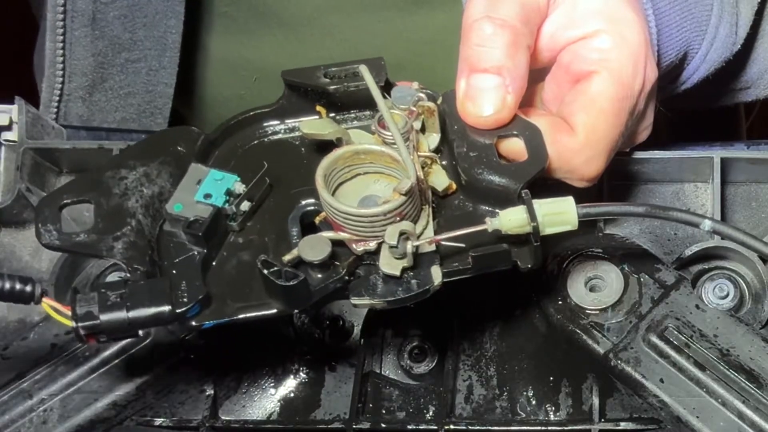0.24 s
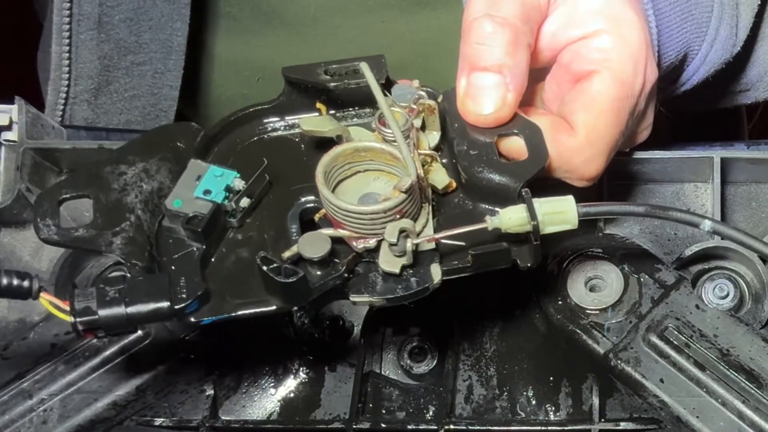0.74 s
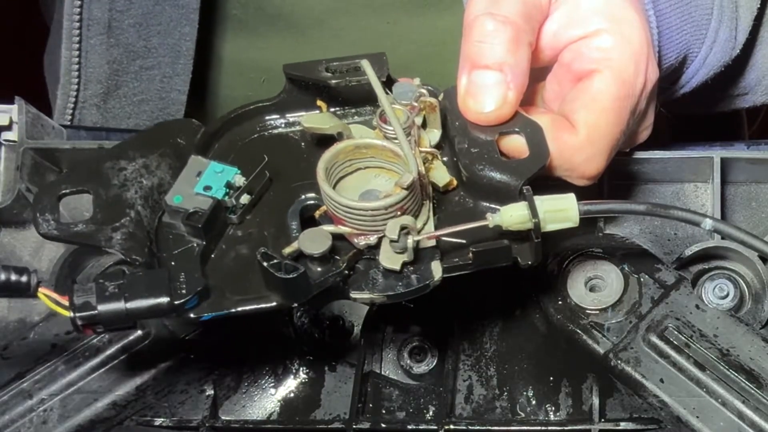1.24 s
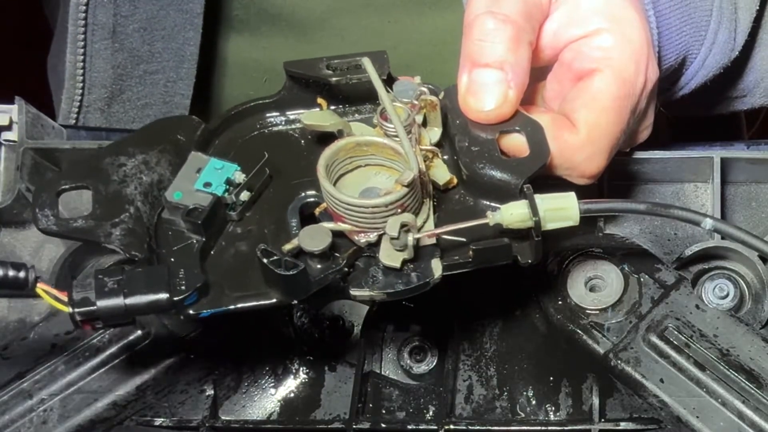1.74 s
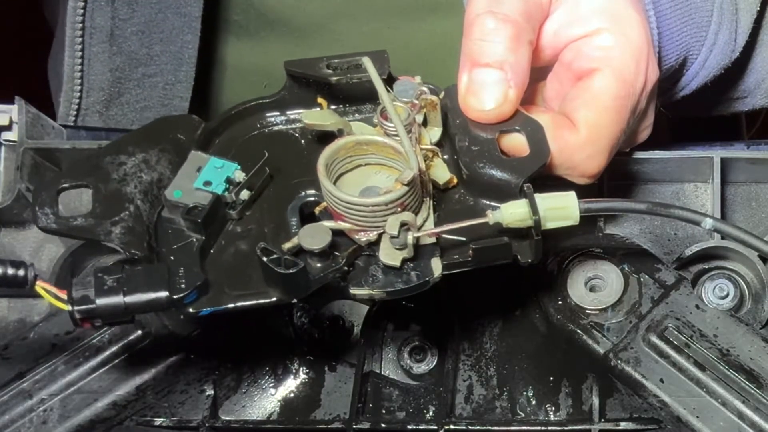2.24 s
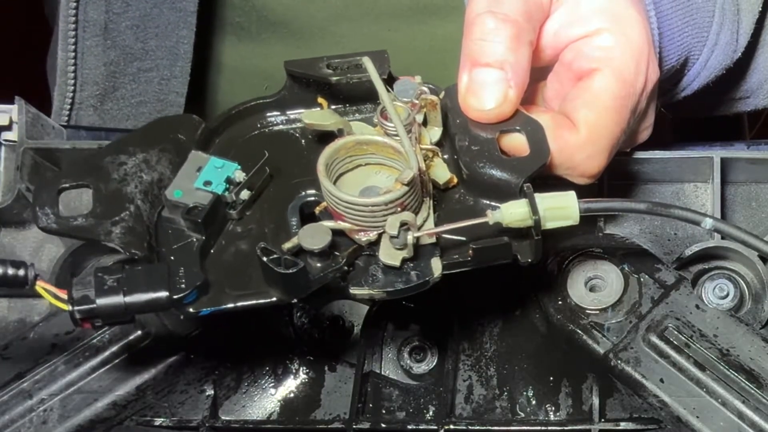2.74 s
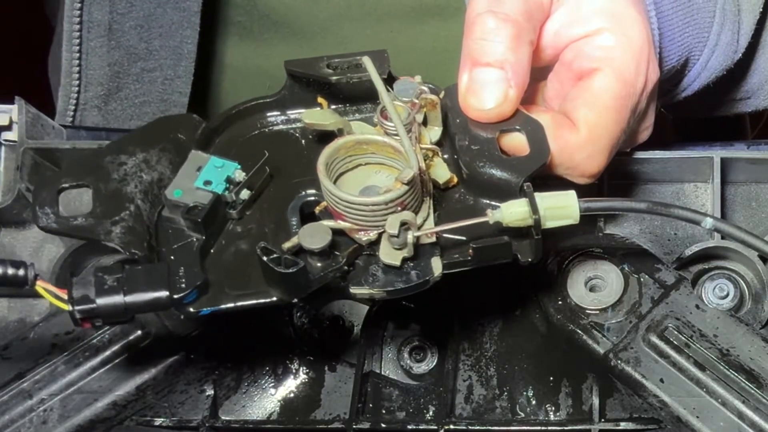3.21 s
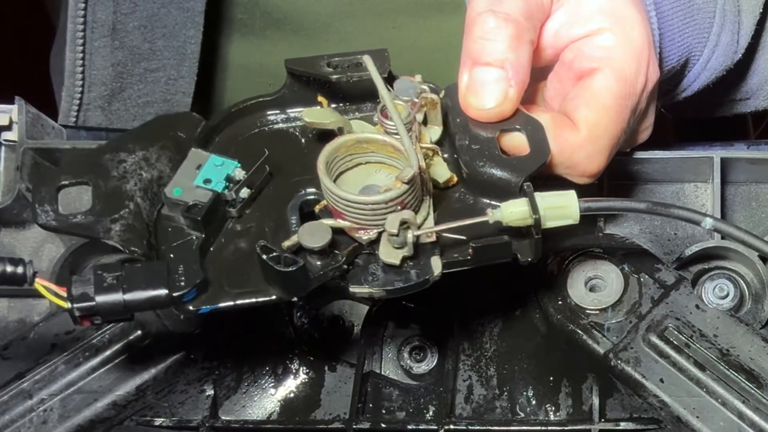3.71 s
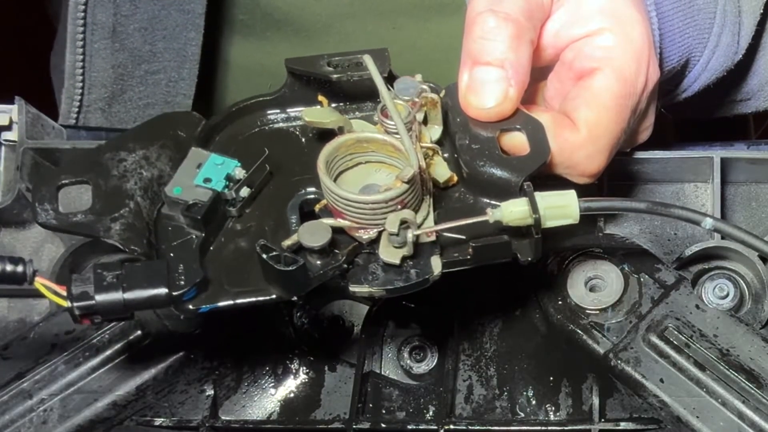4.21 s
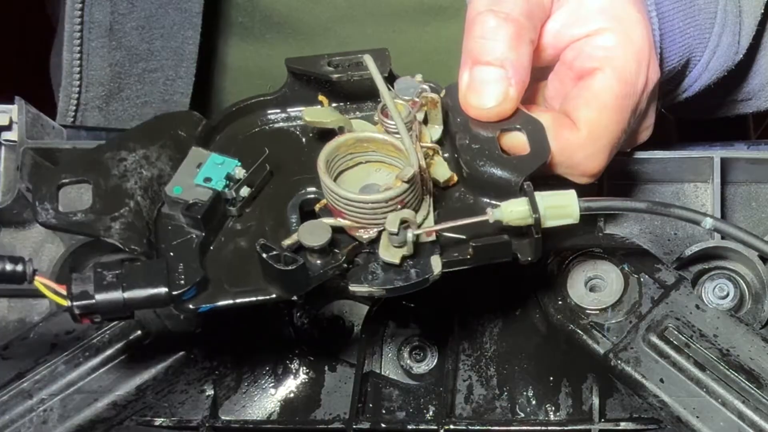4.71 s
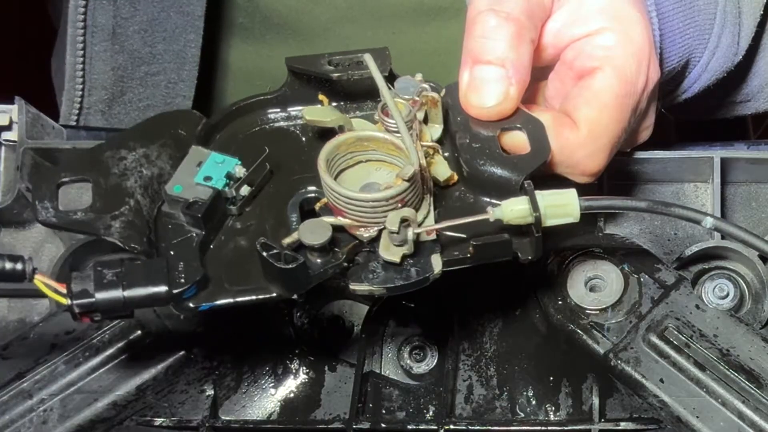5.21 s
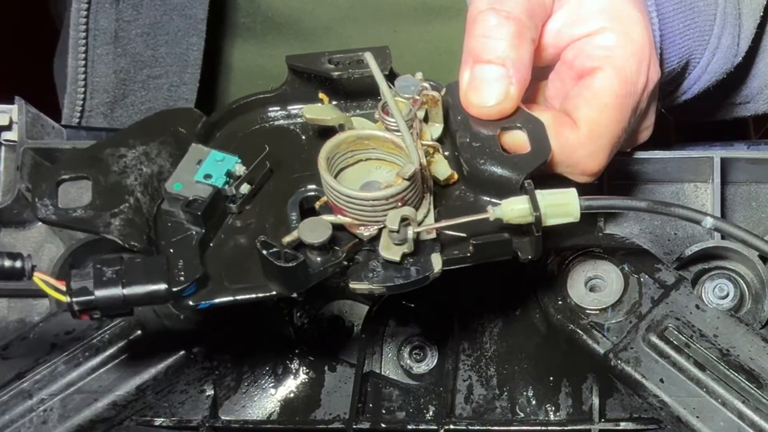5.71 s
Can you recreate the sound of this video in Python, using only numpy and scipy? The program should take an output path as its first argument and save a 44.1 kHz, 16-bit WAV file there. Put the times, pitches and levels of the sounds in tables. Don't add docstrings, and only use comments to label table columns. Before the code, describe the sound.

For about six seconds, a small geared motor works a greased metal latch at a steady two turns per second, heard very close in stereo. The pattern starts at 0 s and repeats every half second. A gritty whine rises quickly and hits a bright, sharp stop at about 0.05 s; the motor reverses near 0.12 s, whirring slightly higher, and slams at 0.18 s with a louder, fuller crack. Tiny high ticks mark the gear play and pawl. From 0.23 s the unpowered lever rubs home for under a tenth of a second. The metal panel and bracket answer each slam with a short, hollow ring. Around 0.37 to 0.42 s into most turns a loose part taps unevenly, slightly left; the last tap comes early, near 5.76 s. Behind are low room air, brief workshop echoes and a faint lamp buzz on the left.

```python
import sys
import numpy as np
from scipy import signal
from scipy.fft import rfft, irfft
from scipy.io import wavfile
from scipy.ndimage import uniform_filter1d

SR = 44100
rng = np.random.default_rng(int(sys.argv[2]) if len(sys.argv) > 2 else 0)


def decibels_to_gain(level_db):
    exponent = np.asarray(level_db, float) / 20
    return 10 ** exponent


def store_wav(level_fs):
    pcm = np.round(np.clip(np.atleast_2d(level_fs), -1, 1) * 32767)
    wavfile.write(sys.argv[1], SR, pcm.T.astype(np.int16))


N = 262395

TURN_S = 0.5
TIME = np.arange(N) / SR
PHASE_S = (TIME + 0.02) % TURN_S - 0.02
SIZE = 270000
HZ = np.fft.rfftfreq(SIZE, 1 / SR)

# f/Hz, level/dB
AIR_COLOUR = [(15, -30), (30, -13.5), (75, 3.5), (144, -4.5), (215, -5.5), (340, -17), (1950, -29),
              (3000, -31.5), (3630, -37), (4380, -35), (8000, -44.5), (10000, -48), (13500, -56),
              (15500, -66)]
AIR_DB = -46
# f/Hz, width/Hz, level/dB
LAMP = [(2950, 250, -69), (4080, 90, -65), (4650, 120, -74), (5170, 100, -77)]
# f/Hz, t60/s
SHOP_DECAY = [(150, 0.28), (500, 0.26), (2000, 0.2), (8000, 0.011)]

# t/s, peak level/dB, thump level/dB, ring f/Hz
TAPS = [(0.369, -48, -41, 1260), (.376, -42, -36, 1184), (.389, -44, -64, 890), (.879, -54, -58, 1130),
        (0.893, -41.5, -60, 1680), (.904, -37, -37, 1670), (.906, -36.5, -44, 1180),
        (1.406, -45, -43, 1705), (1.424, -36, -34.5, 1198), (1.911, -40.5, -55, 1227),
        (1.918, -39.5, -40, 1520), (2.398, -48, -49, 1475), (2.412, -34, -33.5, 870),
        (2.877, -48, -65, 1200), (2.891, -39.5, -40.5, 1140), (3.342, -44.5, -35.5, 1720),
        (3.356, -40, -39, 1210), (3.855, -43.5, -42, 860), (3.868, -41, -40, 1260),
        (4.371, -49.5, -39, 930), (4.389, -49, -44, 1695), (4.879, -52, -49, 1140),
        (4.899, -46.5, -40, 1230), (4.917, -47.5, -44, 1140), (5.373, -46, -54, 1700),
        (5.392, -52, -39.5, 1120), (5.764, -40, -31.5, 1800)]
BARE_DB = {5: 20, 10: 13.5, 23: 17, 26: 27}
EDGE_DB, TAP_PAN_DB = -19, 3.5

# f/Hz, level opening/dB, level closing/dB, left minus right/dB, left lead/rad
PANEL = [(64.4, -39, -47, 0.5, -1.5), (104.7, -29.5, -35, -1, .3), (141.9, -27, -24, 5, 1),
         (162.8, -29, -21.5, -2.5, 1.23), (185, -17, -23, 0, 0.1), (222.3, -20.5, -27.5, 6.5, 3.06),
         (258.2, -25.5, -29.5, -8, -0.33), (310, -30, -34, 14, -1.5)]
BRACKET = [(377.3, -30, -27.5, -15.5, 2.4), (401.6, -17, -32, -13, 0.4), (438.6, -12, -20, -2, 1.34),
           (488, -10.5, -30, -9, 2), (505, -19.5, -28.5, 21, 2), (554, -14, -23, -7.5, 3),
           (581.6, -25, -33, 16, -2), (672.6, -24.5, -21.5, -7, 4), (893.4, -25.5, -23.5, 2, -2.5),
           (976, -27.5, -26.5, -13, 0.5), (1090, -28, -27, -2, 0.7), (1140, -29.5, -22, -1, -3.5),
           (1260, -26.5, -42, 7, -2)]
# f/Hz, t60/s
MODE_DECAY = [(100, 0.53), (190, 0.34), (480, 0.14), (1000, 0.11)]
# f/Hz, rise/s
MODE_BUILD = [(190, 0.024), (380, 0.0055), (900, 0.0019)]
THUDS_S = 0.0565, 0.188
FOCUS_S = (0.0085, 0.00858), (0.036, 0.0085)

# f/Hz, width/Hz, level/dB
HOUSING = [(1100, 150, -3), (2140, 90, -9), (2530, 220, -2), (4250, 140, 0), (6600, 150, -8)]
# f/Hz, level/dB
COAST_COLOUR = [(120, -34), (400, -2.5), (1000, -7.5), (2000, -10.5), (2600, -7.5), (3300, -26),
                (4300, -22.5), (8000, -34.5), (12000, -56)]
COAST_S, COAST_RISE_S, COAST_HOLD_S = 0.2304, 0.011, 0.06
COAST_DB, COAST_SAG_DB_PER_S, COAST_FADE_DB_PER_S = -35.5, 129, 1500

# t/s, level/dB, centre f/Hz, t60/s
TICKS = [
    (-.008, -46, 2600, .05),
    (0.014, -34.5, 8150, 0.14),
    (0.035, -43, 11200, 0.098),
    (0.082, -27.5, 7300, 0.022),
    (0.1248, -31.5, 6400, 0.038),
    (0.14, -35.5, 13000, 0.039),
    (0.163, -20, 5800, 0.027),
    (0.244, -41.5, 5560, 0.059),
    (.254, -51, 4240, 0.014),
    (.297, -54, 6250, 0.019),
]
# t/s, level/dB, rise/s, t60/s
SLAMS = [
    (0.0508, -19.5, 0.0036, 0.057),
    (.181, -10.5, 0.0039, 0.05),
]
# f/Hz, level/dB
SLAM_COLOURS = [
    [(500, -41), (900, 11), (1400, -4), (2000, -14), (2600, -3), (3300, 25.5), (4300, 19), (6000, -10), (8500, -5), (10500, -38), (13000, -16), (15500, -24)],
    [(400, -27), (800, 7), (1000, -31), (1400, 9.5), (2200, 2.5), (3300, 6), (4300, 12), (6000, 2.5), (8500, -3.5), (10500, -6.5), (13000, -63), (15500, -41)],
]

# power on t/s, stop reached t/s, top shaft f/Hz, whine/dB, rattle/dB
STROKES = [
    (-.012, .051, 473.8, -27, -27.5),
    (.119, .182, 514, -26, -26.5),
]
# multiple of shaft f, level opening/dB, level closing/dB
ORDERS = [(1, -9.5, -9), (3, 1, 2), (6, -2.5, 5), (9, 1.5, -1), (18, -0.5, 8.5)]
# f/Hz, level/dB
GEAR_COLOUR = [(250, -20), (450, -2.5), (700, -9.5), (1000, -3.5), (1400, -5), (2000, -10.5), (2600, -7),
               (3300, -18.5), (4300, -6.5), (6000, -19.5), (8500, -15), (10500, -29), (13000, -25),
               (15500, -21.5)]
START_HZ, SPIN_UP_HZ_PER_S, STALL_HZ_PER_S = (210.5, 256.5), (6300, 4900), (870, 4300)
WHINE_RISE_S, RATTLE_RISE_S = (0.019, 0.078), (0.031, 0.0096)
WHINE_FADE_DB_PER_S, RATTLE_FADE_DB_PER_S = (998, 1200), (340, 996)
LABOUR_S, LABOUR_DB_PER_S = 0.013, 300
CRUNCH_DB, CRUNCH_RISE_S, CRUNCH_DECAY_S = (-7.5, -10.5), (0.0037, 0.0053), (0.0061, 0.011)

# f/Hz, left lead/rad; above 9 kHz the sides run opposed, then alike, then opposed
LEFT_LEAD = [(0, 0), (1290, 6.2), (1810, 2.5), (2240, 2.8), (2930, -0.6), (4390, -2.9), (6550, -6.2),
             (8270, -5.2), (9040, -3.1), (10200, -3.1), (11100, -0.0), (13000, 0.0), (13900, 3.0),
             (15500, 3.2)]
# f/Hz, left minus right/dB
PORT_PAN = [(60, -12), (110, 14), (200, 23), (380, -8.5), (700, -0.5), (1290, -5.5), (2380, 0.5),
            (4400, -4), (8120, -1), (15000, -2)]
# from f/Hz, to f/Hz, part lost (0 sum, 1
THINNED = [(8900, 9600, 0, .5), (9600, 10400, 0, .55), (10400, 11000, 1, .4), (11000, 13100, 1, .75),
           (13700, 14500, 0, .65), (14500, 15300, 0, .8), (15300, 16000, 0, .7), (15300, 16000, 1, .4)]


def evened(x):
    return x / np.sqrt(np.mean(x ** 2) + 1e-20)


def read(points, hz):
    f, value = np.transpose(points)
    return np.interp(np.log(hz + 1), np.log(f + 1), value)


def coloured(x, points):
    return evened(irfft(rfft(x, SIZE) * decibels_to_gain(read(points, HZ)))[..., :N])


def resonate(x, hz, width):
    turn = np.exp(2j * np.pi * hz * TIME)
    r = np.exp(-np.pi * width / SR)
    return 2 * (turn * signal.lfilter([1 - r], [1, -r], x / turn)).real


def rising(t, rise):
    return 1 - np.exp(-(np.maximum(t, 0) / rise) ** 2 * 2)


def repeating(fresh=0.34):
    same = np.resize(rng.standard_normal(round(TURN_S * SR)), N)
    return np.sqrt(1 - fresh) * same + np.sqrt(fresh) * rng.standard_normal(N)


def struck(s, rise, t60):
    t = np.maximum(PHASE_S - s, 0)
    return (1 - np.exp(-(t / rise) ** 2)) * decibels_to_gain(-60 * t / t60)


def housed(x, ring_db):
    ring = sum(decibels_to_gain(db) * evened(resonate(x, hz, width)) for hz, width, db in HOUSING)
    return evened(x + decibels_to_gain(ring_db) * evened(ring))


def workshop():
    a, b = rng.standard_normal((2, 2, N))
    shared = np.clip(read([(60, 1.0), (300, 0.65), (1000, 0.046)], HZ), 0, 1)
    air = irfft(np.sqrt(shared) * rfft(a[0], SIZE) + np.sqrt(1 - shared) * rfft(b, SIZE))[:, :N]
    pulses = np.diff(np.floor(100 * TIME), prepend=0) > 0
    pulses = pulses * (1 + 0.3 * a[1]) + 0.02 * a
    buzz = sum(decibels_to_gain(db) * evened(resonate(resonate(pulses, hz, w), hz, 3 * w)) for hz, w, db in LAMP)
    lamp = np.array([buzz[0], np.roll(buzz[1], 3)])
    return decibels_to_gain(AIR_DB) * coloured(air, AIR_COLOUR) + lamp


def echoes(x):
    hz, t, z = signal.stft(rng.standard_normal((2, SR // 2)), SR, nperseg=512)
    z[1, hz < 220] = z[0, hz < 220]
    tail = signal.istft(z * decibels_to_gain(-60 * t / read(SHOP_DECAY, hz)[:, None]), SR, nperseg=512)[1]
    return signal.oaconvolve(x, tail / np.linalg.norm(tail[0]), axes=1)[:, :N]


def taps():
    length = 4000
    t, out = np.arange(length) / SR, np.zeros((2, N + length))
    noises = rng.standard_normal((len(TAPS), 3, length))
    bands = [562, 1500], [2900, 5800], [78, 283]
    dull, bright, low = (signal.butter(2, band, "band", fs=SR) for band in bands)
    sides = decibels_to_gain(TAP_PAN_DB * np.array([[0.5], [-0.5]]))
    for k, (s, db, thump_db, hz) in enumerate(TAPS):
        a, b, c = noises[k]
        edge_db = db + EDGE_DB + BARE_DB.get(k, 0)
        tap = decibels_to_gain(db + 1 - 60 * t / 0.053) * evened(signal.lfilter(*dull, a))
        tap += decibels_to_gain(db + 1 - 60 * t / 0.05) * np.sin(2 * np.pi * hz * t)
        tap += decibels_to_gain(edge_db - 60 * t / 0.029) * evened(signal.lfilter(*bright, b))
        thump = decibels_to_gain(thump_db - 60 * t / 0.14) * evened(signal.lfilter(*low, c))
        tap += thump * np.minimum(t / 0.00086, 1)
        start = round(s * SR)
        out[:, start:start + length] += tap * np.minimum(t / 0.0003, 1) * sides
    return out[:, :N]


def bodywork():
    t, out = np.arange(SR // 2) / SR, np.zeros((2, N))
    hz, *blow_db, pan_db, lead = np.transpose(PANEL + BRACKET)[:, :, None]
    t60, build = read(MODE_DECAY, hz), read(MODE_BUILD, hz)
    for s, db, focus in zip(THUDS_S, blow_db, FOCUS_S):
        at = np.arange(s, N / SR, TURN_S)
        blows = np.zeros(N)
        blows[np.round(at * SR).astype(int)] = decibels_to_gain(0.4 * rng.standard_normal(len(at)))
        swell = decibels_to_gain(db - 60 * t / t60) * (1 - np.exp(-(t / build) ** 2))
        late = np.repeat(focus, (len(PANEL), len(BRACKET)))[:, None]
        for ear, side in enumerate((0.5, -0.5)):
            swing = np.sin(2 * np.pi * hz * (t - late) + side * lead)
            ring = decibels_to_gain(side * pan_db) * swell * swing
            out[ear] += signal.oaconvolve(blows, ring.sum(0))[:N]
    return out


def coast():
    t = np.maximum(PHASE_S - COAST_S, 0)
    db = COAST_DB - COAST_SAG_DB_PER_S * t - COAST_FADE_DB_PER_S * np.maximum(t - COAST_HOLD_S, 0)
    rub = housed(coloured(repeating(), COAST_COLOUR), ring_db=-14.5)
    return rising(t, COAST_RISE_S) * decibels_to_gain(db) * rub


def ticks():
    out = np.zeros(N)
    for s, db, hz, t60 in TICKS:
        out += decibels_to_gain(db) * struck(s, 0.0017, t60) * evened(resonate(repeating(), hz, 0.18 * hz))
    return out


def slams():
    out = np.zeros(N)
    for (s, db, rise, t60), colour in zip(SLAMS, SLAM_COLOURS):
        cracks = housed(coloured(repeating(), colour), ring_db=-16)
        out += decibels_to_gain(db) * struck(s, rise, t60) * cracks
    return out


def stroke(which, tilt_db):
    start, stop, top_hz, whine_db, rattle_db = STROKES[which]
    t, past = PHASE_S - start, np.maximum(PHASE_S - stop, 0)
    moving = (t > 0) & (past < 0.06)

    hz = np.minimum(START_HZ[which] + SPIN_UP_HZ_PER_S[which] * t, top_hz)
    hz = np.maximum(hz - STALL_HZ_PER_S[which] * past, 100)
    wobble = 1 + 0.025 * evened(uniform_filter1d(repeating(), 120))
    turns = np.cumsum(moving * hz * wobble) / SR
    turns -= np.maximum.accumulate(turns * ~moving)

    whine = np.zeros(N)
    for row in ORDERS:
        multiple, order_db = row[0], row[which + 1]
        flutter = decibels_to_gain(5.5 * evened(uniform_filter1d(repeating(), 130)))
        level = decibels_to_gain(order_db + read(GEAR_COLOUR, multiple * hz))
        whine += flutter * level * np.cos(2 * np.pi * multiple * turns)
    labour = np.maximum(PHASE_S - stop + LABOUR_S, 0)
    whine_db = whine_db - WHINE_FADE_DB_PER_S[which] * past - LABOUR_DB_PER_S * labour
    whining = rising(t, WHINE_RISE_S[which]) * decibels_to_gain(whine_db)

    grit = decibels_to_gain(4 * evened(uniform_filter1d(repeating(), 40)))
    colour = [(f, db + tilt_db * np.log2(f / 2000)) for f, db in GEAR_COLOUR]
    rattle = housed(coloured(evened(grit) * repeating(), colour), ring_db=-22)
    rattle_db = rattle_db - RATTLE_FADE_DB_PER_S[which] * past
    rattling = rising(t, RATTLE_RISE_S[which]) * decibels_to_gain(rattle_db)

    crunch = decibels_to_gain(CRUNCH_DB[which]) * rising(past, CRUNCH_RISE_S[which]) * np.exp(-past / CRUNCH_DECAY_S[which])
    bright = rattle - uniform_filter1d(rattle, size=30)
    return moving * (whining * whine + rattling * rattle + crunch * bright)


def paired(x):
    t, (f, lead) = np.arange(900) / SR, np.transpose(LEFT_LEAD)
    half = decibels_to_gain(read(PORT_PAN, HZ) / 2) * np.exp(0.5j * np.interp(HZ, f, lead))
    scatter = rng.standard_normal((2, 900)) * decibels_to_gain(-60 * t / 0.029 - 23)
    return irfft(rfft(x, SIZE) * np.array([half, 1 / half]) * (1 + rfft(scatter, SIZE)))[:, :N]


def scene():
    opening = paired(stroke(0, tilt_db=-1.04))
    closing = paired(stroke(1, tilt_db=-2.5) + coast())
    close = opening + closing + paired(slams() + ticks()) + bodywork() + taps()
    return close + decibels_to_gain(-11.5) * echoes(close) + workshop()


def band_limit(x):
    return signal.sosfilt(signal.butter(12, 15930, fs=SR, output="sos"), x)


def record(dry):
    dry = signal.lfilter(*signal.butter(2, 35, "high", fs=SR), dry)
    held = dry / (1 + (abs(dry) / 0.95) ** 6) ** (1 / 6)
    hz, t, z = signal.stft([held[0] + held[1], held[0] - held[1]], SR, nperseg=1024)
    for low, high, which, share in THINNED:
        kept = np.repeat(rng.random(len(t)) > share, 2)[:len(t)]
        z[which, (hz >= low) & (hz < high)] *= kept
    z = z * (hz < 15900)[:, None]
    total, difference = signal.istft(z, SR, nperseg=1024)[1][:, :N]
    return band_limit(np.array([total + difference, total - difference]) / 2)


dry = scene()
out = record(dry)
store_wav(out)
```